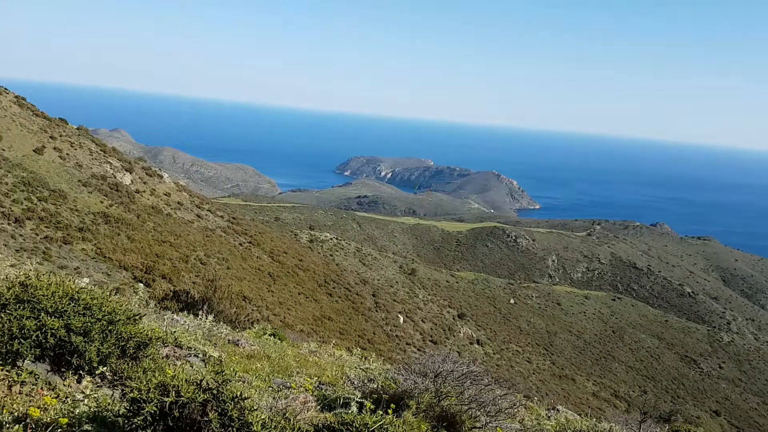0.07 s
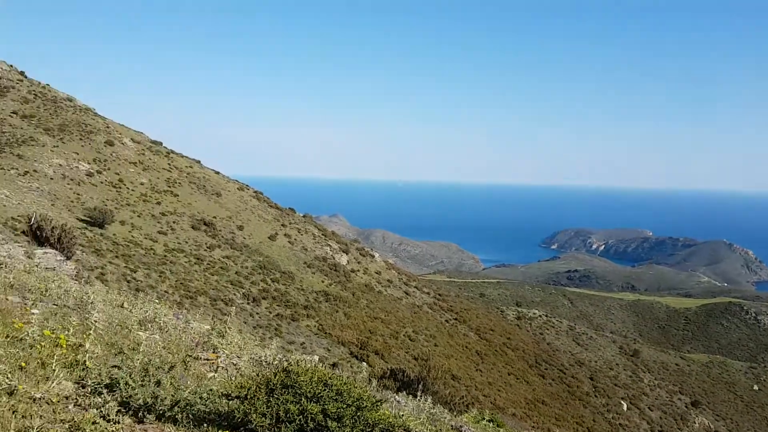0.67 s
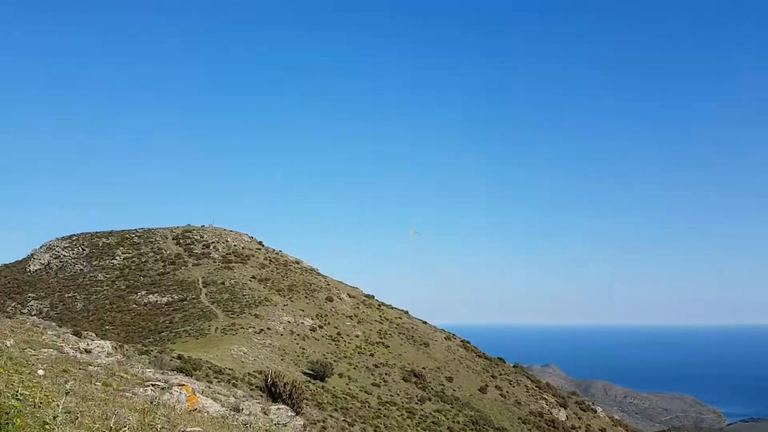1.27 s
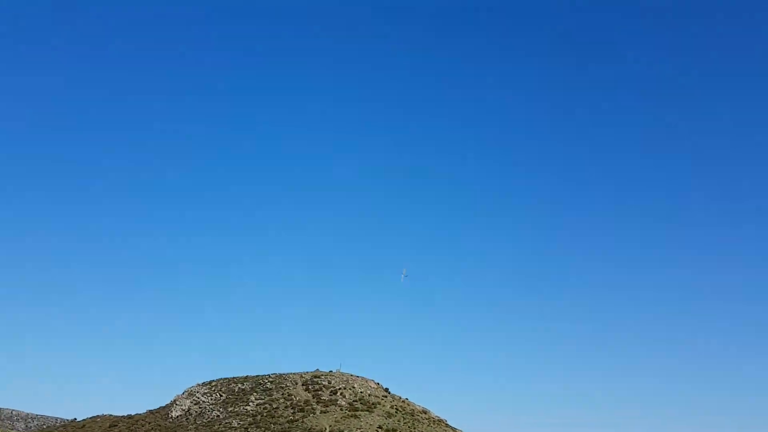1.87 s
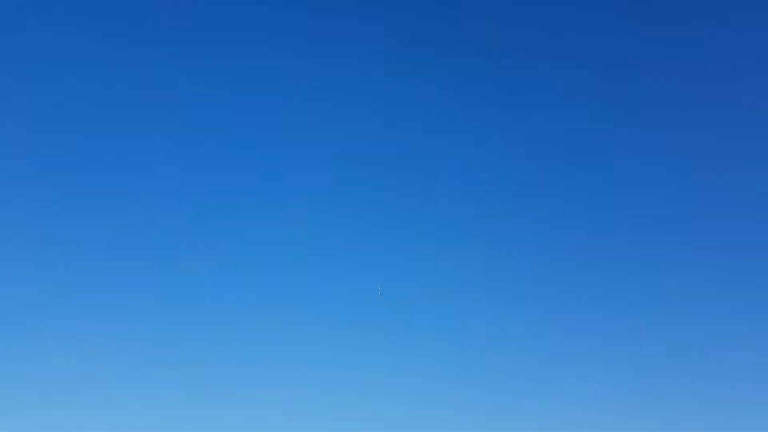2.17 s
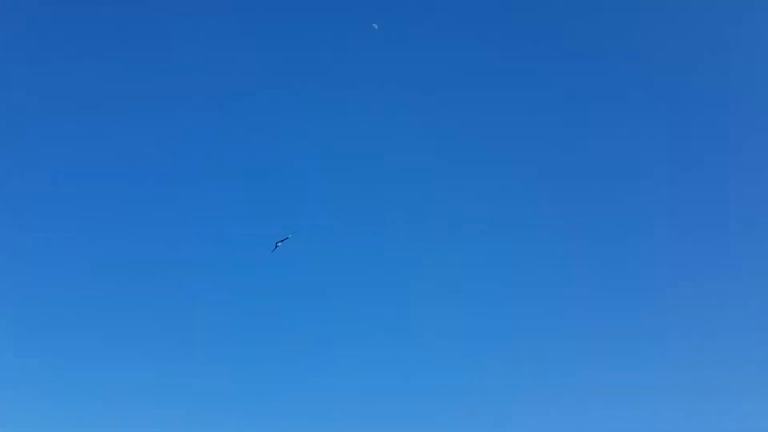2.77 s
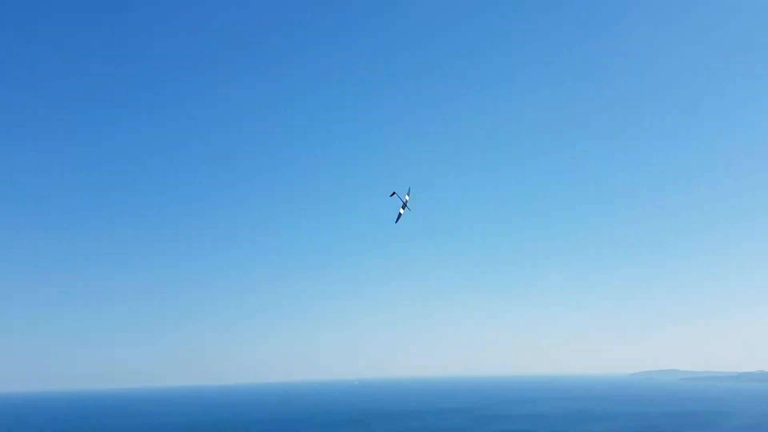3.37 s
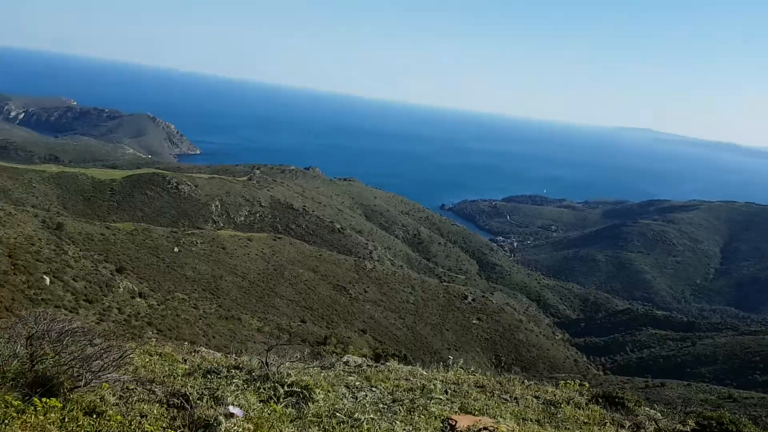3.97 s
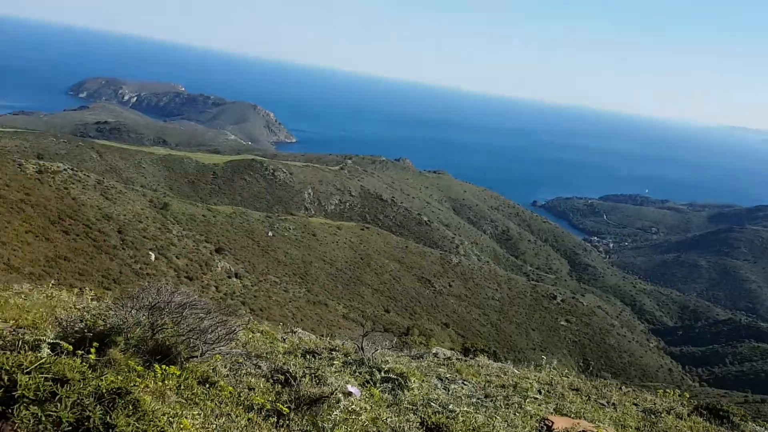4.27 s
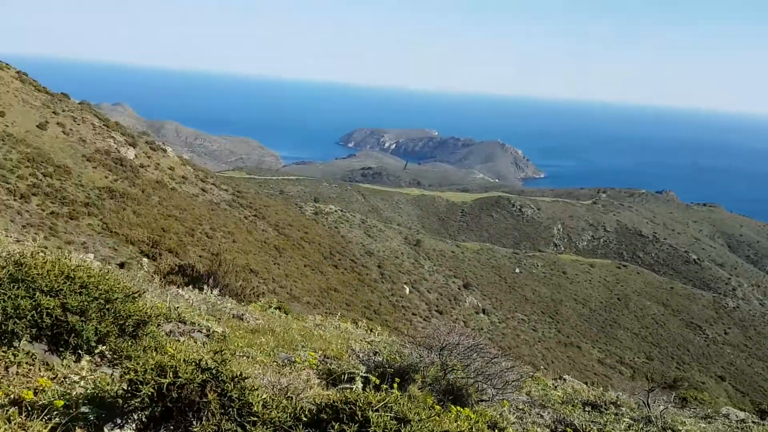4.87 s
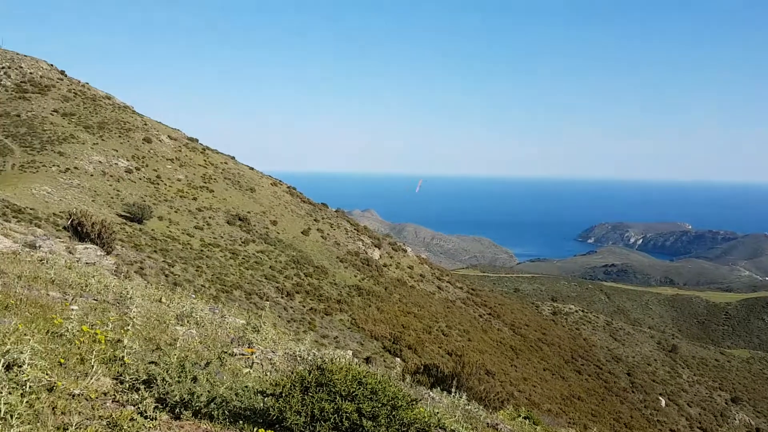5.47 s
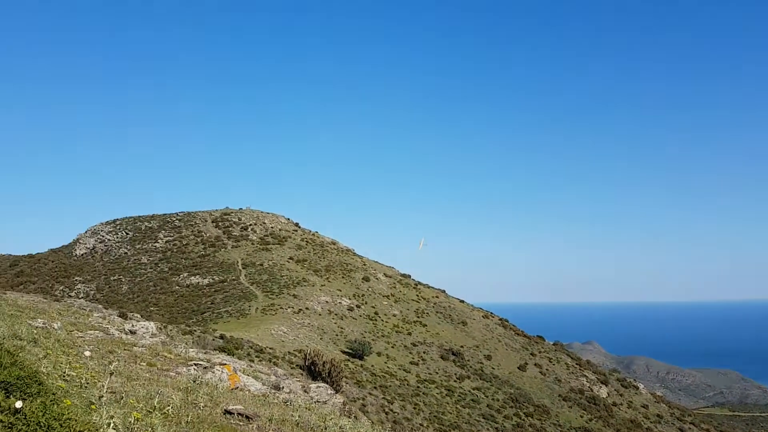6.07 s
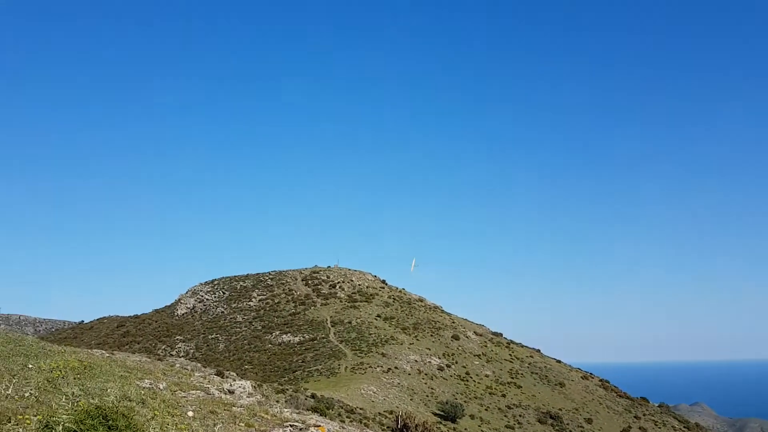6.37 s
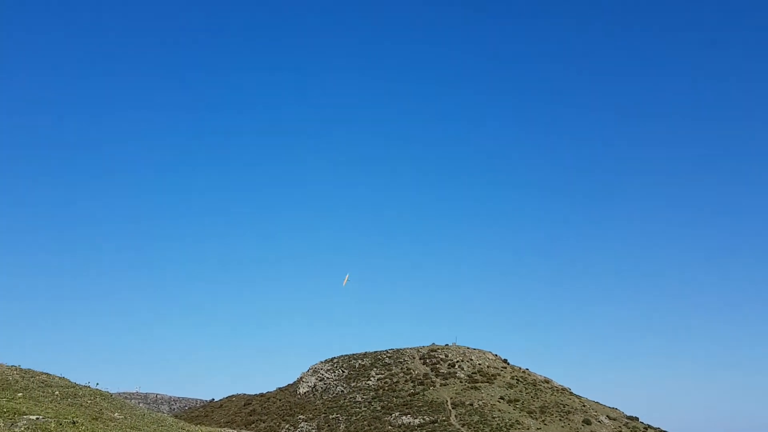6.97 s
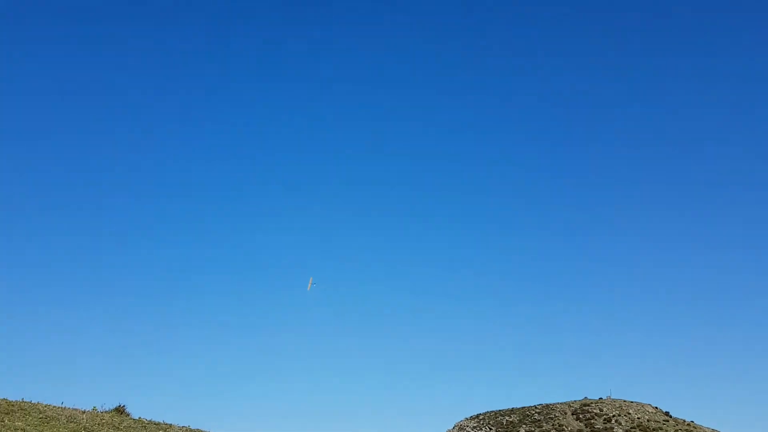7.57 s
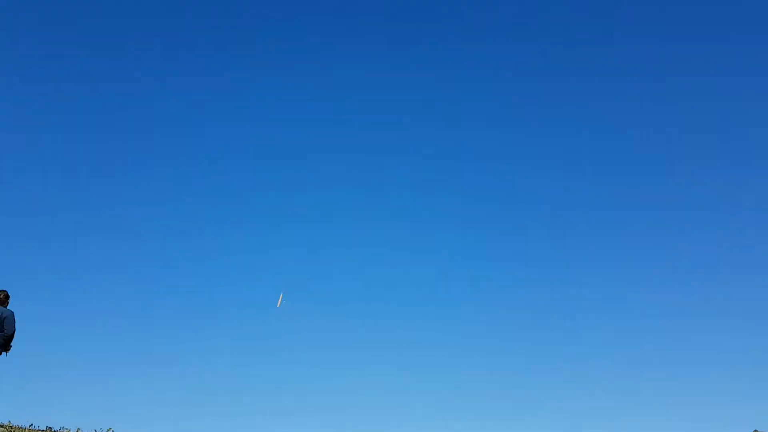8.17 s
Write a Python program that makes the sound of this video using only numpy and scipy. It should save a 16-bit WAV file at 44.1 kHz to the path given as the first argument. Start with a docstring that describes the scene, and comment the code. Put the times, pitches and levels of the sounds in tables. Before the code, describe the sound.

A small glider swoops by with a hissing, falling whistle, amid gusty wind buffeting the microphone and faintly rustling grass.

```python
"""Wind thumps and rumbles in two microphone ports on a coastal hilltop, hardest in the left one.
A model glider dives past, circles far off and turns back: air rushes over its wings and sheds
whistling edge tones that fall in pitch as it goes by. The rumble is turbulence sweeping over the
ports, and each thump is the pressure swing of one eddy. Behind it all a breeze hisses in the scrub
and gusts rustle the grass. The right port is shaded and much weaker."""
import sys
import numpy as np
from scipy import signal
from scipy.fft import rfft, irfft, next_fast_len
from scipy.io import wavfile
from scipy.ndimage import uniform_filter1d, minimum_filter1d, map_coordinates

SR = 44100
rng = np.random.default_rng(int(sys.argv[2]) if len(sys.argv) > 2 else 0)


def transcribe(u):
    """Save the signal u as a 16-bit wav file named by the first command-line argument.

    u: samples, shape (n,) or (channels, n), limited to [-1, 1]; the rate is SR.
    q: integer samples, one column per channel.
    """
    v = np.clip(np.atleast_2d(u).T, -1, 1)
    q = np.round(v * 32767).astype(np.int16)
    wavfile.write(sys.argv[1], SR, q)


N = 362502
T = np.arange(N) / SR

# Wing noise before the Doppler shift. Each row: frequency in Hz, relative density in dB.
WING_SPECTRUM = [(300, -25.5), (900, -18), (1300, -3.5), (2200, -2), (3200, 1), (4300, -4.5), (6000, -15),
                 (7500, -23), (9500, -27.5), (14000, -48.5)]
# Wind between gusts. Each row: time in seconds, relative level in dB at the left port and at the right.
STEADY_WIND = [(0, -29, -45), (0.5, -33, -44), (0.85, -28, -35), (1.25, -29, -42), (1.6, -32, -46.5),
               (1.95, -27, -36), (2.3, -30, -44), (2.65, -28, -39), (2.95, -27, -30), (3.4, -28, -36),
               (3.9, -26, -31), (4.55, -28, -35), (5.3, -26, -31.5), (5.75, -27, -31), (5.95, -37, -47),
               (6.5, -38, -40), (7.2, -39, -44.5), (7.8, -26.5, -38), (8.22, -34.5, -50)]
# Gusts. Each row: start and length in seconds, relative rumble and eddy levels in dB,
# eddy sharpness in Hz, port.
GUSTS = [(0.005, 0.06, -23, -5.5, 145, "left"), (0.111, 0.03, -22, -12, 97, "left"),
         (0.392, 0.041, -25, -27.5, 109, "left"), (0.678, 0.1, -21, -26.5, 88, "left"),
         (1.234, 0.023, -17, -8, 177, "left"), (1.444, 0.03, -24, -15.5, 130.8, "left"),
         (1.649, 0.042, -19, -12.5, 137.4, "left"), (1.883, 0.097, -18, -12.5, 189, "left"),
         (2.037, 0.045, -19, -10, 169.6, "left"), (2.697, 0.042, -21, -22, 113.1, "left"),
         (3.021, 0.082, -26, -18, 125, "left"), (3.051, 0.078, -23, -16.5, 91.17, "right"),
         (3.868, 0.039, -19, -1.5, 236.3, "left"), (3.943, 0.074, -23, -16.5, 140, "left"),
         (4.124, 0.031, -18, -12, 150.3, "left"), (4.361, 0.03, -17.5, -4, 161.3, "left"),
         (4.412, 0.055, -20, -12, 110, "left"), (4.739, 0.06, -19, -8.5, 180.2, "left"),
         (4.879, 0.049, -17, -15.5, 105, "left"), (5.047, 0.046, -18, 1.5, 248.1, "left"),
         (5.103, 0.03, -18.5, -3, 220.3, "left"), (5.152, 0.073, -16, 0.5, 154.6, "left"),
         (5.233, 0.0398, -19, -2, 131.5, "left"), (5.312, 0.055, -16, -1.5, 132, "left"),
         (5.475, 0.082, -19, -26, 90.6, "right"), (5.584, 0.19, -25.5, -35, 91.8, "right"),
         (5.621, 0.037, -16.5, -24, 89.9, "left"), (5.719, 0.056, -20, -9, 125, "left"),
         (5.799, 0.046, -23, -15.5, 109.7, "left"), (6.419, 0.03, -25, -20.5, 130.8, "left"),
         (7.334, 0.062, -25, -23.5, 99.65, "left"), (7.421, 0.065, -28.5, -22, 100.9, "left"),
         (7.495, 0.02, -22, -8.5, 130.6, "left"), (7.579, 0.026, -20, -11, 129.7, "left"),
         (7.749, 0.024, -23, -12, 114.7, "left"), (7.793, 0.026, -23, -10.5, 134.8, "left"),
         (7.864, 0.084, -19.5, -1, 120.8, "left"), (7.951, 0.017, -20, -1.5, 216.6, "left"),
         (7.986, 0.073, -22.5, -12, 238.3, "left"), (8.076, 0.03, -24, -10.5, 129.7, "left"),
         (8.178, 0.032, -29.5, -12, 184.5, "left")]


def glider():
    """Aerodynamic sound: turbulent flow over the wings makes noise, regular shedding makes tones."""
    tones = long_whistles()
    return wing_rush() + sheen() + flutter() + tones + chirps()


def flight(t, pass_s=3.23, miss_m=5.9, loop_diameter_m=141, speed_m_per_s=69.3, sound_m_per_s=303):
    """Doppler effect and spherical spreading on a circular path: gives pitch factor and rush in dB."""
    # Swells of airy hiss: the glider's rush near the pass, gusts rustling the grass far from it.
    # Each row: time and half width in seconds, gain in dB.
    swells = [(0.059, 0.016, 14), (0.39, 0.042, 9.5), (0.76, 0.091, 9), (1.12, 0.078, 6), (1.83, 0.071, 4),
              (2.15, 0.16, 11), (2.351, 0.1, 16.5), (2.51, 0.069, 6.5), (2.9, 0.2, 0), (3.28, 0.034, 2.5),
              (3.5, 0.086, 8), (3.73, 0.018, 7.5), (4.42, 0.066, 11), (4.661, 0.066, 9),
              (5.29, 0.022, 14.5), (5.38, 0.03, 12), (5.63, 0.066, 14), (5.88, 0.28, 12), (6.93, 0.033, 7),
              (7.33, 0.047, 8)]
    angle = speed_m_per_s * (t - pass_s) / loop_diameter_m
    chord = loop_diameter_m * np.sin(angle)
    distance = np.hypot(miss_m, chord)
    receding = chord * np.cos(angle) / distance
    doppler = 1 / (1 + receding * speed_m_per_s / sound_m_per_s)
    nose_on_loss_db = 2 * np.maximum(-receding, 0) ** 8
    swell_db = sum(db * np.exp(-((t - s) / width) ** 2) for s, width, db in swells)
    return doppler, -24 - 20 * np.log10(distance) - nose_on_loss_db + swell_db


def wing_rush():
    """Turbulence on the wings radiates Doppler-shifted noise; its far swells are heard as grass rustle."""
    def shifted_db(t, hz):
        doppler, _ = flight(t)
        return spectrum(WING_SPECTRUM, hz / doppler)
    _, rush_db = flight(T)
    return amp(rush_db) * airy_noise(shifted_db, patchy_db=2.5, flicker_db=1.0)


def sheen():
    """The highest band of the flow noise is a silky hiss, heard only near the glider."""
    # Envelope. Each row: time in seconds, level in dB.
    levels = [(1.9, -102), (2.35, -70), (2.85, -67), (2.98, -60), (3.17, -69), (3.28, -56), (3.35, -65),
              (3.75, -71), (4.2, -93)]
    # Spectrum. Each row: frequency in Hz, relative density in dB.
    density = [(5000, -39.5), (9500, -5.5), (11200, 1.5), (12200, -6), (13000, -1), (14200, -9),
               (16000, -13.5)]
    noise = airy_noise(lambda t, hz: spectrum(density, hz), patchy_db=0, flicker_db=-1.5)
    return amp(curve(levels)) * noise


def long_whistles():
    """Edge tones fall in pitch through the pass; a firm one grows out of a wide, fuzzy one."""
    # Four whistles, the last a hollow low note. Each row: time in seconds, pitch in Hz, level in dB.
    thin = [(2.66, 5030, -60), (2.73, 4975, -44.5), (2.87, 4925, -43.5), (3.0, 4880, -44.5),
            (3.09, 4760, -46), (3.18, 4610, -47), (3.29, 4480, -44), (3.35, 4440, -58)]
    firm = [(3.17, 3700, -52), (3.23, 3540, -40), (3.31, 3370, -35), (3.35, 3310, -46), (3.41, 3215, -41),
            (3.45, 3190, -44), (3.49, 3140, -39), (3.56, 2995, -39), (3.62, 2975, -44), (3.69, 2960, -62)]
    wide = [(2.88, 4580, -56), (2.98, 4400, -47), (3.1, 4150, -45), (3.19, 3860, -38), (3.29, 3500, -37),
            (3.35, 3350, -52), (3.44, 3280, -47), (3.5, 3200, -40), (3.6, 3050, -49), (3.68, 2980, -68)]
    low = [(2.95, 900, -63), (3.25, 815, -48.5), (3.5, 770, -58), (3.9, 710.4, -54.5)]
    approach = thin[:5]  # upper partials sound only on the way in
    return (whistle(thin, gain_db=-.5, width_hz=55, fuzz=.3, waver=.0018)
            + whistle(approach, gain_db=-24, width_hz=120, fuzz=.95, waver=.0018, partial=1.5)
            + whistle(approach, gain_db=-23, width_hz=80, fuzz=.9, waver=.0018, partial=2)
            + whistle(firm, gain_db=-.5, width_hz=110, fuzz=.6, waver=.004)
            + whistle(wide, gain_db=-1.5, width_hz=300, fuzz=.9, waver=.008)
            + whistle(low, gain_db=-1, width_hz=120, fuzz=.93, waver=.004))


def whistle(rows, gain_db, width_hz, fuzz, waver, partial=1):
    """Unsteady airflow modulates an edge tone's frequency; partial scales both pitch and bandwidth."""
    t = np.arange(rows[0][0], rows[-1][0], 1 / SR)
    hz = partial * curve(rows, t=t) * (1 + waver * wander(rate_hz=50, size=len(t)))
    level = amp(curve(rows, column=2, t=t) + gain_db) * signal.windows.tukey(len(t), .1)
    out = np.zeros(N)
    add(out, rows[0][0], level * edge_tone(hz, partial * width_hz, fuzz))
    return out


def chirps(gain_db=-1, tremble_db=1.5, skirt_db=-7):
    """Air catching gaps in the wings sheds brief edge tones, each a thin core in a skirt of hiss."""
    # Each row: start and end in seconds, first and last pitch in Hz, relative level in dB.
    glides = [(0.701, 0.837, 3250, 3150, -56), (1.828, 1.963, 4250, 4076, -57.5),
              (1.819, 1.957, 5200, 5100, -62), (1.974, 2.047, 5670, 5530, -55.5),
              (1.979, 2.127, 7450, 7300, -65.5), (2.15, 2.23, 5100, 4950, -50.5),
              (2.247, 2.337, 4280, 3805, -42), (2.278, 2.437, 5820, 5570, -47),
              (2.334, 2.43, 5240, 5180, -48), (2.435, 2.607, 4930, 5106, -53),
              (2.48, 2.562, 6285, 6090, -54), (2.567, 2.727, 4620, 4560, -56.5),
              (2.62, 2.74, 7800, 7650, -63), (2.888, 3.1, 5260, 4910, -64), (2.914, 3.06, 6280, 6000, -56),
              (3.14, 3.297, 4070, 3750, -44), (3.232, 3.323, 6930, 6703, -52),
              (3.458, 3.567, 6480, 5900, -56.5), (3.59, 3.652, 3780, 4050, -52.5),
              (4.252, 4.35, 2900, 3127, -58.5), (4.348, 4.491, 3112, 3170, -51.5),
              (4.48, 4.553, 3310, 3394, -57), (4.6, 4.771, 3150, 3328, -50.5),
              (4.602, 4.741, 4120, 4240, -58), (5.209, 5.406, 4467, 4260, -57.5),
              (5.46, 5.624, 4385, 4277, -62.5)]
    out = np.zeros(N)
    for start, end, start_hz, end_hz, db in glides:
        hz = np.linspace(start_hz, end_hz, max(round((end - start) * SR), 2))
        level = amp(db + gain_db + tremble_db * wander(rate_hz=28, size=len(hz)))
        core = edge_tone(hz, width_hz=95, fuzz=.75)
        skirt = amp(skirt_db) * edge_tone(hz, width_hz=600, fuzz=1)
        add(out, start, level * (core + skirt) * signal.windows.tukey(len(hz), .6))
    return out


def flutter(per_s=130, gain_db=-14, spread_db=4.0, approach_db_per_octave=20, fall=0.015):
    """Fleeting edge tones slide down inside the rush, louder where the Doppler shift is upward."""
    out = np.zeros(N)
    for when, pitch, length, size in rng.random((int(per_s * N / SR), 4)):
        start = when * N / SR
        hz = 3000 * 3.3 ** pitch
        t = np.arange(0, .05 + .08 * length, 1 / SR)
        doppler, rush_db = flight(start + t[-1] / 2)
        db = rush_db + gain_db + spread_db * (2 * size - 1)
        db += 0.75 * spectrum(WING_SPECTRUM, hz / doppler) + approach_db_per_octave * np.log2(doppler)
        tone = edge_tone(hz * (1 - fall * t / t[-1]), width_hz=43, fuzz=0.4)
        add(out, start, amp(db) * tone * np.hanning(len(t)))
    return out


def edge_tone(hz, width_hz, fuzz):
    """Nearly periodic vortex shedding: a sine plus narrowband noise, fuzz being the noise's power share."""
    pole = np.exp(-np.pi * width_hz / SR)
    re, im = rng.standard_normal((2, len(hz)))
    band = signal.lfilter([1], np.poly([pole, pole]), re + 1j * im)
    band /= np.sqrt(np.mean(abs(band) ** 2))
    envelope = np.sqrt(1 - fuzz) + np.sqrt(fuzz) * band
    carrier = np.exp(2j * np.pi * np.cumsum(hz) / SR)
    return np.sqrt(2) * (envelope * carrier).real


def rumble(port, middling_db, quickening, lumpy_db, lull_slowing=.35):
    """Frozen turbulence sweeps over a port: faster air is louder and brighter, and lulls dull it."""
    # Turbulence at a middling wind speed. Each row: frequency in Hz, relative density in dB.
    turbulence = [(10, -25), (35, -6.5), (70, 1.5), (160, -2.5), (300, -19.5), (450, -37), (700, -50.5),
                  (1500, -97)]
    lumps = unit(amp(lumpy_db * wander(rate_hz=45)))
    level = wind_pressure(port) * lumps
    speed = (level / amp(middling_db)) ** quickening * (1 - lull_slowing * lull(T))
    travel = np.cumsum(np.clip(speed, .4, 2))
    field = unit(colour(rng.standard_normal(2 * N), turbulence))
    pressure = map_coordinates(field, [travel], order=1, mode="wrap")
    local_power = uniform_filter1d(pressure ** 2, size=2600)
    return level * pressure / np.sqrt(local_power + 0.0067)


def wind_pressure(port, rise_s=0.01217, tail_s=.03):
    """Incoherent sources add in power: the steady wind plus gusts that rise, hold and fall."""
    power = amp(curve(STEADY_WIND, column=1 if port == "left" else 2)) ** 2
    for start, length, db, _, _, side in GUSTS:
        if side == port:
            t = np.arange(0, rise_s + length + tail_s, 1 / SR)
            envelope = np.clip(np.minimum(t / rise_s, (t[-1] - t) / (tail_s + rise_s)), 0, 1)
            add(power, start - rise_s, (amp(db) * envelope) ** 2)
    return np.sqrt(power)


def lull(t):
    """Wind is intermittent: the depth of its lulls at times t, from 0 to 1."""
    # Each row: centre and half width in seconds.
    lulls = [(0.239, 0.053), (0.512, 0.057), (2.299, .17), (3.569, 0.083), (4.08, 0.03), (4.26, 0.02906),
             (4.97, 0.043), (6.85, 0.093)]
    return np.minimum(sum(np.exp(-((t - s) / width) ** 4) for s, width in lulls), 1)


def gust_eddies(port, gain_db=-7.5, spread_db=3.0, spread_octaves=0.64, small_db=-6.5, taper_db=-7):
    """A gust cascades into overlapping eddies that bunch and taper; small ones are sharper and weaker."""
    out, spacing_s, edge_s = np.zeros(N), .0025, .004
    for start, length, _, db, hz, side in GUSTS:
        draws = rng.uniform(-1.104, 1, (200, 4))
        if side == port:
            for k, (late, size, sharp, shape) in enumerate(draws[:round(length / spacing_s) + 1]):
                age = (k + late) * spacing_s
                progress = np.clip((age + edge_s) / (length + 2 * edge_s), 0, 1)
                arch = np.sin(np.pi * progress ** 0.51)  # crests early in the gust
                eddy_db = db + gain_db + spread_db * size + small_db * sharp + taper_db * (1 - arch)
                add_eddy(out, start + age, eddy_db, hz * 2 ** (spread_octaves * sharp), shape)
    bunching = amp(3.5 * wander(rate_hz=92))
    return port_ring(out * bunching)


def thumps(main_db=-2, swirl_db=-11, swirl_s=0.00592):
    """A hard eddy strikes as a pressure pulse, with a small swirl just ahead and another behind."""
    # Each row: time in seconds, relative pressure in dB, sharpness in Hz.
    hard_eddies = [(0.021, 2.5, 177), (0.084, -14.5, 187), (0.391, -8, 122), (0.719, -6.5, 77),
                   (0.76, -8, 102), (0.772, -7, 85), (0.819, -6, 85.5), (0.949, 3, 140), (1.056, -5, 110),
                   (1.136, -11, 98), (1.159, -9.5, 79.46), (1.232, -7, 231.7), (1.244, -8, 244),
                   (1.253, 5, 126), (1.327, -1, 165.4), (1.335, 3.5, 147), (1.364, -3.5, 101),
                   (1.411, -5.5, 220.9), (1.878, -1.5, 334), (1.903, 0, 310), (1.945, 3.5, 202),
                   (2.042, 1, 175), (2.054, -4.5, 230), (2.123, -9.5, 65), (2.581, -14.5, 160),
                   (2.705, -7, 70), (2.718, -4, 80), (2.735, -13.5, 190), (2.857, -7.5, 82.8),
                   (3.069, -5.5, 105), (3.078, -12, 180), (3.227, -2, 69.5), (3.318, -3.5, 70),
                   (3.484, -10.5, 147.4), (3.887, 0.5, 181.3), (3.923, -3, 260), (3.972, -5.5, 189.7),
                   (4.126, -7, 240), (4.146, 1.5, 236), (4.326, -7.5, 165), (4.355, -0.5, 234.2),
                   (4.381, -0.5, 139.9), (4.669, -3.5, 152.9), (4.741, -2, 139.6), (4.753, -3.5, 255),
                   (4.784, 0.5, 218.4), (4.796, -7.5, 308.6), (4.878, -6, 104.6), (5.037, -1, 164.5),
                   (5.061, -3.5, 288), (5.076, 0, 301), (5.136, -2, 287.3), (5.211, 3, 240.4),
                   (5.322, -1.5, 130.9), (5.493, -4, 122.8), (5.593, 0, 122.6), (5.722, -0.5, 121.2),
                   (7.323, -7.5, 123), (7.502, -6.5, 135), (7.537, 1, 100), (7.58, 1.5, 85),
                   (7.588, -9.5, 306.6), (7.637, -7, 150), (7.84, 1.5, 95), (7.876, -5, 208.3),
                   (7.899, 5.5, 229.8), (7.909, 6, 159), (7.956, -3.5, 220), (7.967, 4.5, 436),
                   (7.975, 1.5, 328.2), (7.993, -9.5, 400.3)]
    out = np.zeros(N)
    for s, db, hz in hard_eddies:
        add_eddy(out, s, db + main_db, hz, shape=rng.uniform(-0.85, 1))
        for way in (-1, 1):
            offset_s = way * swirl_s * rng.uniform(0.32, 1)
            add_eddy(out, s + offset_s, db + swirl_db, hz, shape=rng.uniform(-0.95, 1))
    return port_ring(out)


def stray_eddies(per_s=28, gain_db=6, spread_db=5, lull_db=-7, sharp_hz=85, spread_octaves=0.054):
    """Convection on the steady wind brings soft eddies to the left port at random, weaker in lulls."""
    out = np.zeros(N)
    for when, size, sharp, shape in rng.uniform(-1, 1, (600, 4))[:int(per_s * N / SR)]:
        s = abs(when) * N / SR
        db = curve(STEADY_WIND, t=s) + lull_db * lull(s) + gain_db + spread_db * size
        add_eddy(out, s, db, sharp_hz * 2 ** (spread_octaves * sharp), shape)
    return port_ring(out)


def add_eddy(mix, s, db, sharp_hz, shape):
    """A passing vortex is one pressure swing, brighter when briefer; shape 0 pushes, 1 or -1 pulls."""
    t = np.arange(-1024, 1024) / SR
    pressure = (np.exp(1j * np.pi * shape) / (1 - 2j * np.pi * sharp_hz * t) ** 2).real
    add(mix, s + t[0], amp(db) * pressure * np.hanning(len(t)))


def port_ring(x, port_hz=75, port_q=1.0):
    """The microphone's bass roll-off is a resonant high-pass that rings briefly after each blow."""
    w = 2 * np.pi * port_hz
    return signal.lfilter(*signal.bilinear([1, 0, 0], [1, w / port_q, w ** 2], SR), x)


def ticks(decay_cycles=1.0):
    """Heavily damped oscillations die within a cycle or two and sound as tiny dry clicks."""
    # Each row: start in seconds, level in dB, frequency in Hz.
    clicks = [(3.842, -32, 13000), (7.899, -33, 3560), (7.975, -25, 3924)]
    out, t = np.zeros(N), np.arange(128) / SR
    for s, db, hz in clicks:
        add(out, s, amp(db) * np.exp(-hz * t / decay_cycles) * np.cos(2 * np.pi * hz * t))
    return out


def breeze(gain_db=12):
    """Turbulent flow through the scrub radiates broadband noise that swells and sinks."""
    # Envelope. Each row: time in seconds, relative level in dB.
    levels = [(0, -68), (0.65, -69), (0.82, -67.5), (0.9, -61.5), (1.12, -61.5), (1.45, -65.5), (1.53, -59),
              (1.6, -73.5), (1.75, -73), (2.03, -63), (2.65, -73.5), (3.3, -66.5), (3.8, -59.5), (4.2, -68),
              (4.87, -66), (4.97, -62), (5.1, -67.5), (6.05, -70), (6.25, -63), (6.98, -65), (7.17, -67),
              (7.7, -71), (8.22, -64)]
    # Spectrum. Each row: frequency in Hz, relative density in dB.
    density = [(100, -3), (450, -9), (800, -2), (1200, -4.5), (2500, -9.5), (4500, -20), (7000, -31),
               (10000, -36.5)]
    noise = airy_noise(lambda t, hz: spectrum(density, hz), patchy_db=3.5, flicker_db=2.0)
    return amp(curve(levels) + gain_db) * noise


def hiss(level_db):
    """Stationary noise lays a faint, even floor under one channel."""
    # Each row: frequency in Hz, relative density in dB.
    density = [(500, 8), (3000, 5), (6000, -5.5), (9000, -9.5), (12500, -1.5), (16000, -2)]
    return amp(level_db) * unit(colour(rng.standard_normal(N), density))


def airy_noise(field_db, patchy_db, flicker_db):
    """Short-time spectral shaping: noise of spectrum field_db(s, Hz), with patches and a level flicker."""
    frame, hop = 1024, 256
    t = np.arange(N // hop + 5)[:, None] * hop / SR
    hz = np.fft.rfftfreq(frame, 1 / SR)
    re, im, patches = rng.standard_normal((3, len(t), len(hz)))
    patches = unit(uniform_filter1d(uniform_filter1d(patches, size=11, axis=0), size=7, axis=1))
    flicker = unit(uniform_filter1d(rng.standard_normal(t.shape), size=9, axis=0))
    gain = amp(field_db(t, hz) + patchy_db * patches)
    gain *= amp(flicker_db * flicker) / np.linalg.norm(gain, axis=1, keepdims=True)
    _, noise = signal.istft((gain * (re + 1j * im)).T, nperseg=frame, noverlap=frame - hop)
    return unit(noise[:N])


def colour(x, points):
    """Filtering multiplies the spectrum of x by a response given in dB."""
    size = next_fast_len(len(x))
    response = amp(spectrum(points, np.fft.rfftfreq(size, 1 / SR)))
    return irfft(rfft(x, size) * response, size)[:len(x)]


def spectrum(points, hz):
    """Interpolation of a table on a log-frequency axis."""
    f, db = np.transpose(points)
    return np.interp(np.log(hz + 1), np.log(f + 1), db)


def curve(rows, column=1, t=T):
    """Linear interpolation of one column over time."""
    rows = np.array(rows)
    return np.interp(t, rows[:, 0], rows[:, column])


def wander(rate_hz, size=N):
    """A spline through random values gives smooth motion of rms near 1."""
    knots = rng.standard_normal(8192)
    return map_coordinates(knots, [np.arange(size) * rate_hz / SR], order=2, mode="wrap")


def add(mix, s, sound):
    """Superposition of a sound on the mix from s seconds on."""
    start = round(s * SR)
    sound = sound[max(-start, 0):]
    part = mix[max(start, 0):][:len(sound)]
    part += sound[:len(part)]


def amp(db):
    """Decibels to amplitude ratio."""
    return 10 ** (np.asarray(db) / 20)


def unit(x):
    """Normalisation to rms 1."""
    return x / np.sqrt(np.mean(x ** 2) + 1e-20)


def scene():
    """Turbulence is local, so each port has its own wind; the right one lies in an acoustic shadow."""
    # The right port's shade. Each row: frequency in Hz, gain in dB.
    shade = [(100, -2), (400, 2.5), (800, -9.5), (1400, -14.5), (2500, -23.5), (4500, -31.5), (8000, -32),
             (15000, -18)]
    # Glider, scrub and hiss dip after the hardest gust. Each row: time in seconds, gain in dB.
    dip_levels = [(7.92, 0), (7.99, -9.5), (8.22, -8.5)]
    plane, scrub, dip = glider(), breeze(), amp(curve(dip_levels))
    left = dip * (plane + scrub + hiss(level_db=-65))
    left += gust_eddies("left") + thumps() + stray_eddies() + ticks()
    left += amp(2.5) * rumble("left", middling_db=-25, quickening=.16, lumpy_db=4.0)
    delayed_plane = np.roll(plane, 14)
    shaded = colour(delayed_plane + 0.35 * scrub + 1.1 * breeze(), shade)
    right = dip * (shaded + hiss(level_db=-69)) + gust_eddies("right")
    right += amp(-0.2) * rumble("right", middling_db=-31, quickening=0.27, lumpy_db=2.5)
    return np.array([left, right])


def record(dry, ceiling_db=-.2, recovery_db_per_s=260, cutoff_hz=15800):
    """Look-ahead limiting turns the hardest thumps smoothly down; a low-pass then limits the band."""
    peak_db = 20 * np.log10(abs(dry).max(axis=0) + 1e-9)
    over_db = np.maximum(peak_db - ceiling_db, 0)
    recovery_db = T * recovery_db_per_s
    held_db = np.maximum.accumulate(over_db + recovery_db) - recovery_db
    ramp = np.hanning(401)
    gain_db = signal.oaconvolve(minimum_filter1d(-held_db, size=len(ramp)), ramp / ramp.sum(), "same")
    low_pass = signal.firwin(511, cutoff_hz, window=("kaiser", 9), fs=SR)
    return signal.oaconvolve(dry * amp(gain_db), low_pass[None], "same")


dry = scene()
out = record(dry)
transcribe(out)
```